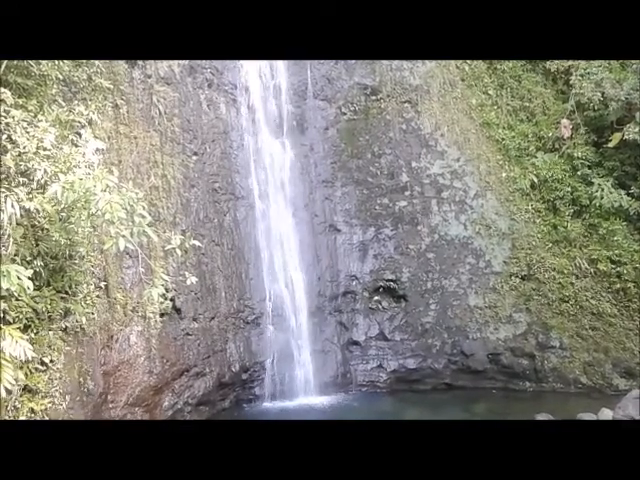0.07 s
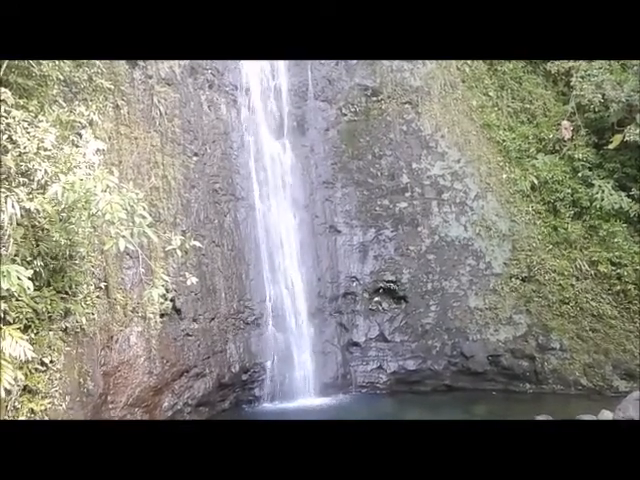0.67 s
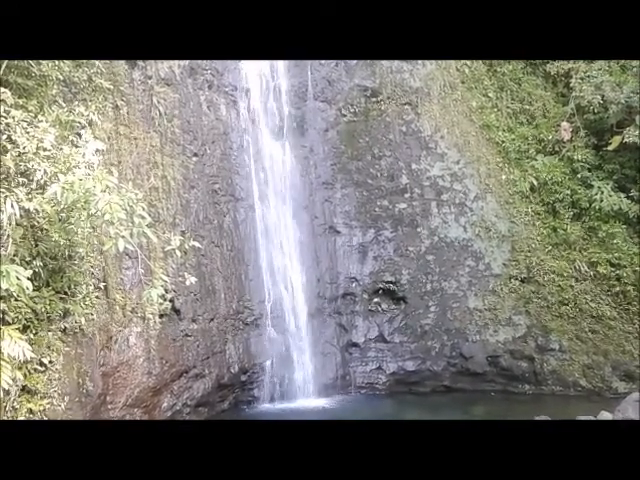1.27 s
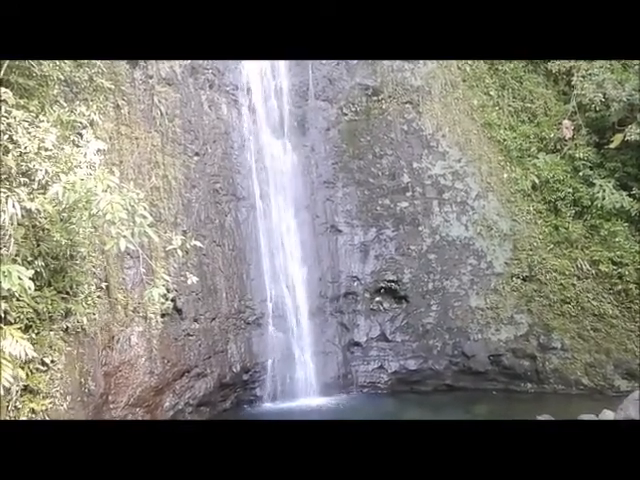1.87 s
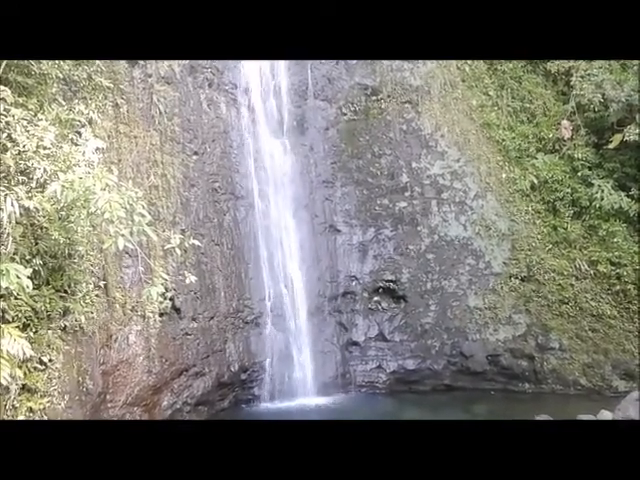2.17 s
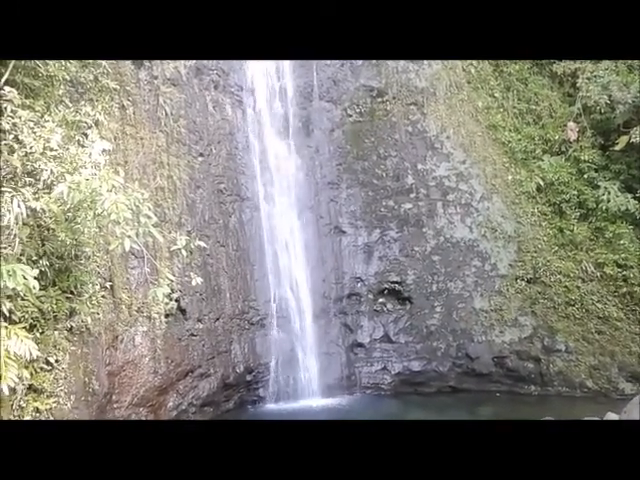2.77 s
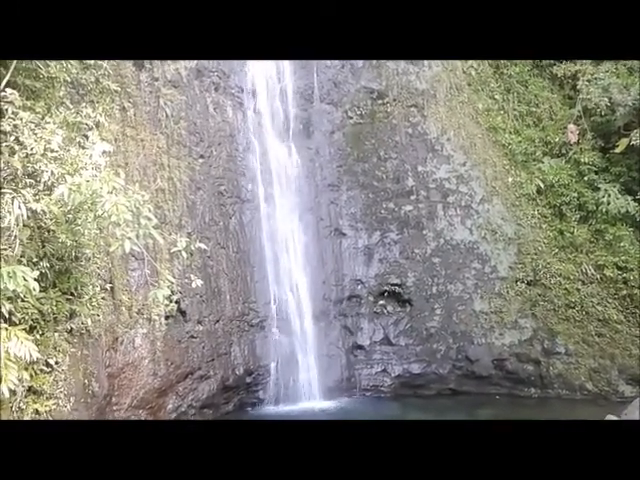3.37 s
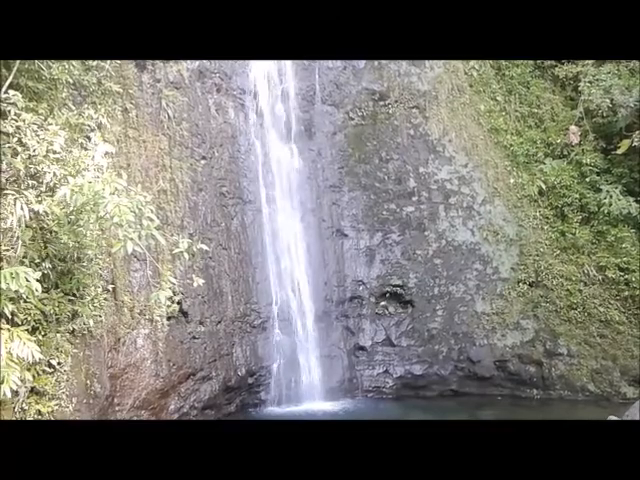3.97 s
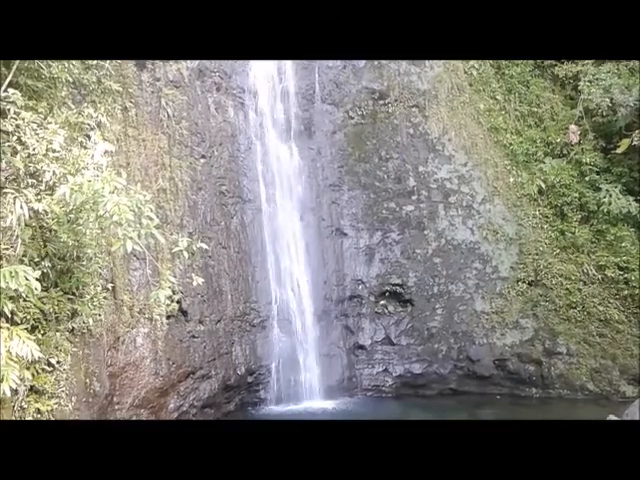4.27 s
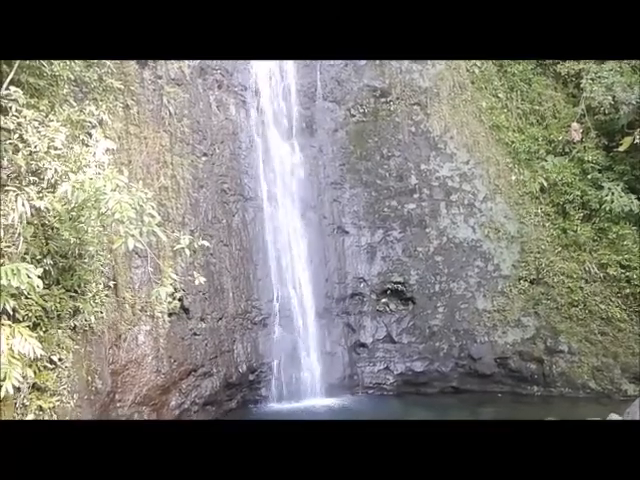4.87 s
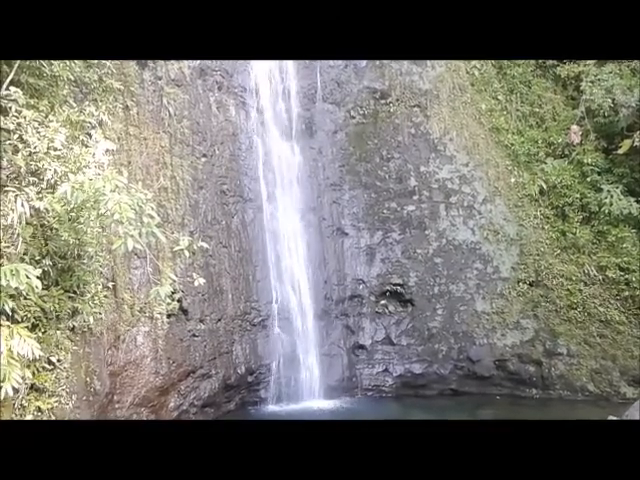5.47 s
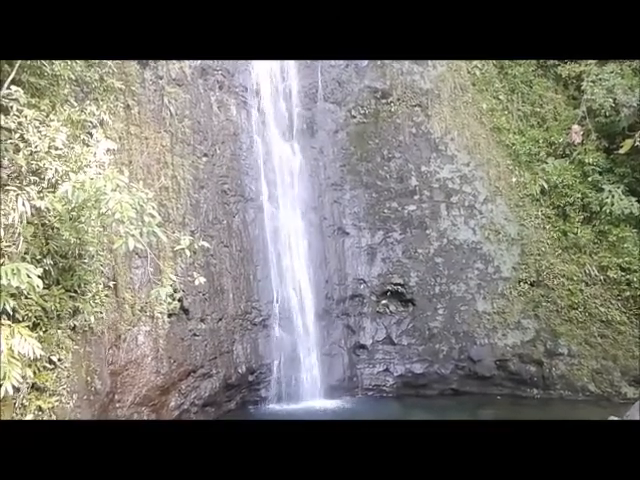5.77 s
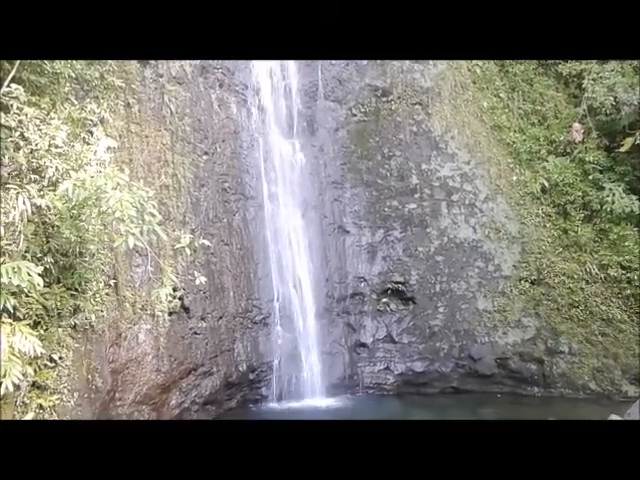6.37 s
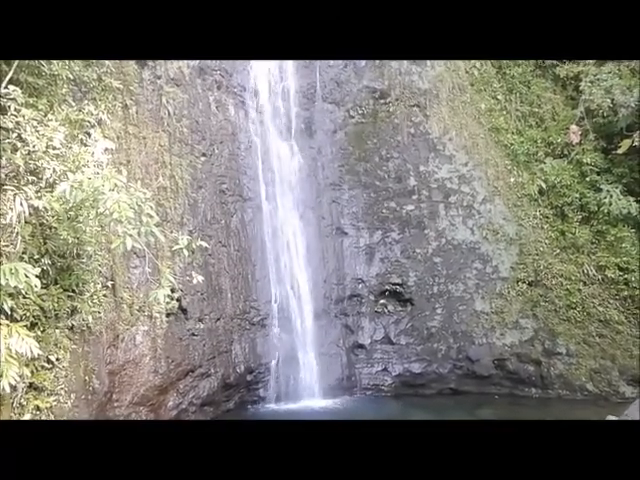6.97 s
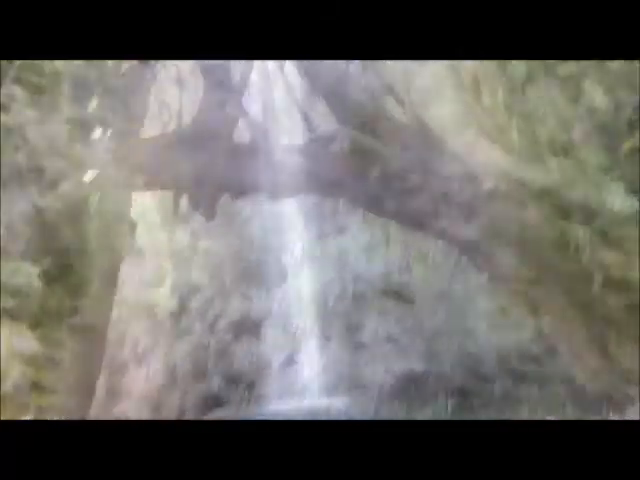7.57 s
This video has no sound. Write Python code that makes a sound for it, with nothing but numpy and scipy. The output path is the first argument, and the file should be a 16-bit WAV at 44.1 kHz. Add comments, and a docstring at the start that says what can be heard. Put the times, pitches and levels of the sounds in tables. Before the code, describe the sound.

A waterfall pours steadily into a rock pool, an even rushing hiss with a few small glugs and plops.

```python
"""On the bank of a rock pool, a tall, thin waterfall pours steadily, heard through two small mic ports.
Countless drop impacts and ringing bubbles merge into an even rush; large pockets of air glug in the
pool, and a near rock surface adds a short echo. A breeze brushes the ports at first and more softly
near the end, and one faint low note rises. The recorder gates weak bass and fades the sound out."""
import sys
import numpy as np
from scipy import signal
from scipy.fft import rfft, irfft
from scipy.io import wavfile
from scipy.ndimage import uniform_filter1d

SR = 44100
rng = np.random.default_rng(int(sys.argv[2]) if len(sys.argv) > 2 else 0)


def generate_wav(sig):
    """Save sig (samples, or channels by samples) to the path in sys.argv[1] as 16-bit PCM at SR."""
    pcm = np.round(np.clip(np.atleast_2d(sig).T, -1, 1) * 32767).astype(np.int16)
    wavfile.write(sys.argv[1], SR, pcm)


N = 336483
TIME = np.arange(N) / SR
FREQ = np.maximum(np.arange(N // 2 + 1) * SR / N, 1)

# gusts on the ports: peak_s, level_db
BREEZE_GUSTS = [(.55, -54.5), (6.2, -65)]
# tone of the wind rumble: freq_hz, gain_db
BREEZE_EQ = [(20, -22), (45, -18), (85, 3), (130, -16), (300, -45), (1000, -90)]
# glide of the faint note under the rush: time_s, pitch_hz, level_db
NOTE_GLIDE = [(1.07, 440, -75), (1.115, 438, -42.5), (1.15, 448, -45), (1.19, 472, -44.5),
              (1.235, 480, -43), (1.28, 465, -75)]
# the largest air pockets, which glug and plop above the rest: peak_s, pitch_hz, peak_db
AIR_POCKETS = [(.127, 2570, -31), (.62, 86, -53.5), (.771, 256, -42), (.80, 100.4, -54), (0.987, 183, -47),
               (1.15, 95, -55), (1.527, 167, -47), (1.615, 132, -51), (1.70, 110, -51.5), (2.08, 105, -58),
               (2.301, 100, -59), (2.806, 217, -45), (2.859, 200, -44), (2.94, 115, -48.5),
               (3.008, 151, -47), (3.023, 510, -37), (3.309, 125, -53), (3.412, 1180, -31),
               (3.46, 101, -53), (3.541, 1560, -26.5), (3.67, 90, -57), (4.03, 100, -55), (4.153, 270, -42),
               (4.2, 100, -53), (4.27, 581, -34), (4.535, 316, -46), (4.564, 1410, -33), (4.719, 680, -36),
               (4.88, 105, -53.5), (5.732, 1070, -31), (5.80, 100, -60), (5.979, 142, -47),
               (5.986, 254, -41), (6.158, 288, -44), (6.766, 104, -57), (6.932, 109, -50.5),
               (7.03, 170, -47)]
# brief dips in the bass of the rush: centre_s, half_length_s, depth_db
BASS_DIPS = [(.73, 0.018, 8), (1.055, 0.032, 17), (1.833, .035, 11), (2.472, 0.044, 8), (2.74, 0.03, 11),
             (3.603, .04, 6), (4.397, .03, 6), (4.68, .06, 10), (5.267, .03, 10)]
# overall tone of the falling water: freq_hz, gain_db
WATER_EQ = [(22, -53), (45, -39), (85, -33.5), (140, -28), (230, -22), (380, -28.5), (510, -24.5),
            (580, -25), (680, -24.5), (800, -26.5), (1130, -23.5), (1330, -23.5), (1560, -20),
            (1830, -19.5), (2030, -17.5), (3200, -17), (4300, -16.6), (9000, -25.7), (14300, -28)]
# colour each port gives the water: freq_hz, left_db, right_db
PORT_EQ = [(60.0, 6, -1), (200.0, -2, -2), (890, 1.15, 1.4), (1560, 3, -2.5), (2490, -2.5, -3),
           (3180, -7.5, -2.5), (4010, -2, -1.3), (4640, 5.5, -0.5), (5560, 4.5, 5.5), (7040, -2, 8),
           (8300, -4, 8), (9870, -0.5, 2.1), (12700.0, -3, 0), (14700, -2, -7)]
# how alike the two ports hear the water: freq_hz, coherence_0_to_1, left_lead_rad
STEREO_IMAGE = [(40.0, 0.1, -0.5), (200.0, 0.65, -0.2), (405, 0.57, 0.15), (593, 0.89, 0.43),
                (785, 0.81, 0.74), (1070, 0.78, 0.67), (1320, 0.72, -0.9), (2080, 0.33, -1.08),
                (3050, 0.24, -2.5), (3800, 0.25, -0.4), (4990, 0.2, -2), (6750, 0.3, -3),
                (9300.0, 0.1, -1.9), (13000.0, 0.12, -4)]
# balance drift as the ports turn a little in the hand: time_s, left_minus_right_db
HAND_TURN = [(0, 0.3), (1.9, -.25), (4.2, 0), (5.8, 0.1), (7.1, 0.5)]
# where the wind suppressor closes, against each band's mean level: freq_hz, threshold_db
GATE_THRESHOLD = [(30, 2), (80, 2), (130, -2), (200, -8), (380, -4), (520, -5), (900, -30)]


def undb(db):
    """Decibels to gain."""
    return 10 ** (np.asarray(db) / 20)


def unit(x):
    """Scale to rms 1."""
    return x / np.sqrt(np.mean(x ** 2))


def over_time(table):
    """A table's automation curves at every sample."""
    times, *columns = np.transpose(table)
    return [np.interp(TIME, times, column) for column in columns]


def over_pitch(table):
    """A table's spectral curves at every frequency."""
    hz, *columns = np.transpose(table)
    return [np.interp(np.log(FREQ), np.log(hz), column) for column in columns]


def wander(rate):
    """A smooth random modulator at rms 1 that moves about rate times a second."""
    steps = rng.standard_normal(int(4 * rate * N / SR) + 8)
    steps = uniform_filter1d(uniform_filter1d(steps, size=2), size=2)
    return unit(np.interp(TIME * 4 * rate, np.arange(len(steps)), steps))


def hit_gain(draw, spread_db, cap=6):
    """Turn uniform draws into gains: many soft hits, a few loud ones."""
    return undb(spread_db * np.minimum(-np.log(1 - draw), cap))


def breeze(rise_s=0.66, fall_s=0.15):
    """Each gust builds slowly and drops quickly; its eddies rumble on each port separately."""
    eddies = irfft(rfft(rng.standard_normal((2, N))) * undb(over_pitch(BREEZE_EQ)[0]), N)
    force = 0
    for peak_s, level_db in BREEZE_GUSTS:
        width_s = np.where(TIME < peak_s, rise_s, fall_s)
        force += undb(level_db) * np.exp(-((TIME - peak_s) / width_s) ** 2)
    flutter = undb(3 * wander(rate=16.5))
    return unit(eddies * flutter) * force


def faint_note():
    """A short sine tone slides upward and sags as it dies."""
    pitch_hz, level_db = over_time(NOTE_GLIDE)
    sounding = (TIME > NOTE_GLIDE[0][0]) & (TIME < NOTE_GLIDE[-1][0])
    return np.sqrt(2) * np.sin(2 * np.pi * np.cumsum(pitch_hz) / SR) * undb(level_db) * sounding


def air_pockets(rise=0.03):
    """Each large pocket of air swells as it is driven under, rings with a slight upward bend and dies."""
    out = np.zeros(N)
    for peak_s, pitch_hz, peak_db in AIR_POCKETS:
        swell_s = 0.0209 * (250 / pitch_hz) ** 0.65  # smaller, higher pockets speak faster
        near = abs(TIME - peak_s) < 6 * swell_s
        age = np.maximum((TIME[near] - peak_s) / swell_s + 1, 0)  # 1 at the peak
        turns = pitch_hz * swell_s * (age + rise * (age - 1) ** 2 / 2) + rng.random()
        envelope = (age * np.exp(1 - age)) ** 2
        out[near] += undb(peak_db) * envelope * np.sin(2 * np.pi * turns)
    return out


def drops(rate, spread_db):
    """Drops strike rock and pool as sharp clicks, rate times a second."""
    when, size, polarity = rng.random((int(rate * N / SR), 3)).T
    clicks = hit_gain(size, spread_db) * np.sign(polarity - 0.5)
    return unit(np.bincount((when * N).astype(int), clicks, N))


def slaps(rate, decay_s, spread_db):
    """Clumps of water burst on the rock, each a short spatter that dies quickly."""
    when, size = rng.random((int(rate * N / SR), 2)).T
    hits = np.bincount((when * N).astype(int), hit_gain(size, spread_db, cap=4) ** 2, N)
    power = signal.lfilter([1], [1, -np.exp(-1 / (decay_s * SR))], hits + 1e-12)
    return unit(rng.standard_normal(N) * np.sqrt(power))


def bubbles(rate, low_hz, high_hz, cycles, rise, spread_db, samples=1024):
    """Trapped air rings briefly, rising in pitch as it nears the surface."""
    when, pitch, size, polarity = rng.random((int(rate * N / SR), 4)).astype(np.float32).T[:, :, None]
    hz = low_hz * (high_hz / low_hz) ** pitch
    age = hz * np.arange(samples, dtype=np.float32) / SR / cycles
    ring = np.exp(-np.pi * age) * np.sin(2 * np.pi * cycles * age * (1 + rise * age / 2))
    strength = hit_gain(size, spread_db) * np.sign(polarity - 0.5) * hz
    place = (when * N).astype(int) + np.arange(samples)
    return unit(np.bincount(place.ravel(), (strength * ring).ravel(), N)[:N])


def surge(spectrum, heave_db, bass_reach_octaves=0.5):
    """The rush surges as sheets of water land; heavy water moves only the lowest octaves."""
    surge_db = 0.09 * wander(rate=6)
    dip_db = sum(db * np.exp(-((TIME - centre_s) / half_s) ** 2) for centre_s, half_s, db in BASS_DIPS)
    octave = np.log2(np.clip(FREQ / 125, 1, 2 ** 7))
    out = np.zeros(N)
    for k in range(8):
        band = irfft(spectrum * np.maximum(1 - abs(octave - k), 0), N)
        flicker_db = 0.35 * wander(rate=14)  # each size of drop and bubble flickers on its own
        bass_db = (heave_db - dip_db) * np.exp(-k / bass_reach_octaves)
        out += band * undb(surge_db + flicker_db + bass_db)
    return rfft(out)


def splash(heave_db):
    """The spectrum of one stretch of the fall: fine spray layered with drops, slaps and bubbles."""
    spray = rng.standard_normal(N)
    patter = undb(-9.5) * drops(rate=5000, spread_db=2.5)
    spatter = undb(-11.5) * slaps(rate=110, decay_s=0.0063, spread_db=2.0)
    froth = undb(-14.5) * bubbles(rate=380, low_hz=523, high_hz=3493, cycles=33, rise=0.065, spread_db=2)
    fizz = undb(-11.5) * bubbles(rate=600, low_hz=3013, high_hz=11005, cycles=123, rise=0.01, spread_db=1)
    glugs = undb(-21) * bubbles(rate=85, low_hz=104.8, high_hz=401.3, cycles=15.4, rise=0.065,
                                spread_db=0.26, samples=8192)
    # small drops carry little bass: that comes from large pockets of air driven under the surface
    low_shelf = np.interp(FREQ, [250, 520], [0.45, 1])
    rush = low_shelf * rfft(unit(spray + patter + spatter + froth + fizz))
    return surge(rush + rfft(glugs), heave_db)


def rock_echo(delay_s, gain, dull_hz):
    """A rough rock surface close by returns the longer waves and scatters the short ones."""
    return 1 + gain / (1 + (FREQ / dull_hz) ** 4) * np.exp(-2j * np.pi * FREQ * delay_s)


def waterfall(trim_db=-0.22):
    """The plunge reaches both ports; what the cliff scatters reaches each of them differently."""
    coherence, left_lead_rad = over_pitch(STEREO_IMAGE)
    heave_db = 1.5 * wander(rate=18)  # the weight of water landing in the pool heaves at random
    mid = np.sqrt((1 + coherence) / 2) * splash(heave_db)
    side = np.sqrt((1 - coherence) / 2) * splash(heave_db)
    stereo = np.array([(mid + side) * np.exp(1j * left_lead_rad), mid - side])
    colour = undb(over_pitch(WATER_EQ)[0] + np.array(over_pitch(PORT_EQ)))
    echo = rock_echo(delay_s=0.001904, gain=0.21, dull_hz=2240)
    balance_db, = over_time(HAND_TURN)
    pan = undb(np.array([balance_db, -balance_db]) / 2)
    return undb(trim_db) * pan * irfft(stereo * colour * echo, N)


def scene():
    """A wide wash of water, with the glugs of the pool, the breeze and the note beneath it."""
    return waterfall() + air_pockets() + breeze() + faint_note()


def wind_suppressor(x, depth_db, frame=1700):
    """A gate ducks each bass band on both ports at once whenever that band is weak."""
    hz, _, bands = signal.stft(x, SR, nperseg=frame)
    power = uniform_filter1d(abs(bands.mean(axis=0)) ** 2, size=3, axis=-1)
    power = uniform_filter1d(power, size=3, axis=-2)
    threshold_db = np.interp(hz, FREQ, over_pitch(GATE_THRESHOLD)[0])[:, None]
    threshold = power.mean(axis=-1, keepdims=True) * undb(threshold_db) ** 2
    closed = 1 / (1 + (power / threshold) ** 6)
    return signal.istft(bands * undb(-depth_db * closed), SR, nperseg=frame)[1][:, :N]


def record(dry, fade_start_s=7.06, fade_scale_s=0.14, top_hz=14500):
    """The recorder gates the bass, fades out (fast at first, then slower) and cuts the top."""
    gated = wind_suppressor(dry, depth_db=12)
    fade = (1 + np.maximum(TIME - fade_start_s, 0) / fade_scale_s) ** -3.05
    high_cut = signal.ellip(12, 0.1, 80, top_hz, fs=SR, output="sos")
    return signal.sosfilt(high_cut, gated * fade)


dry = scene()
out = record(dry)
generate_wav(out)
```